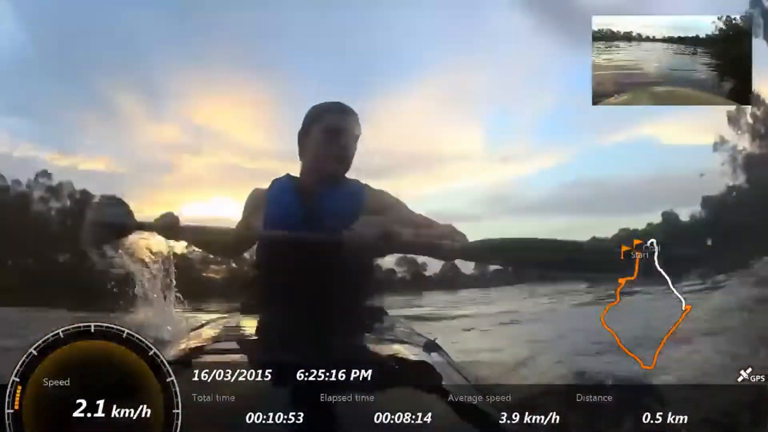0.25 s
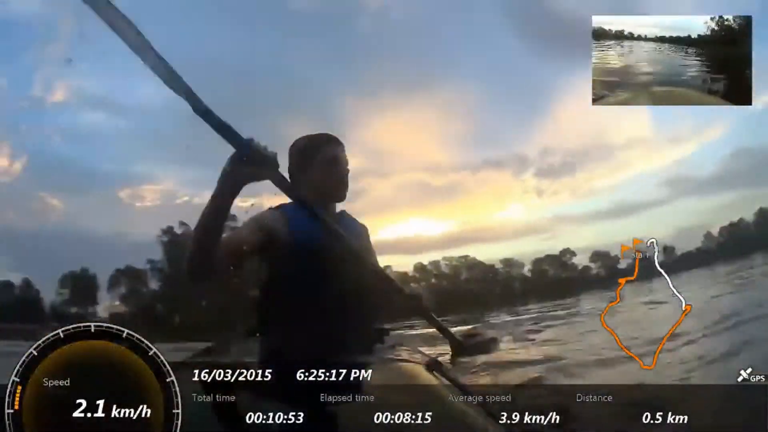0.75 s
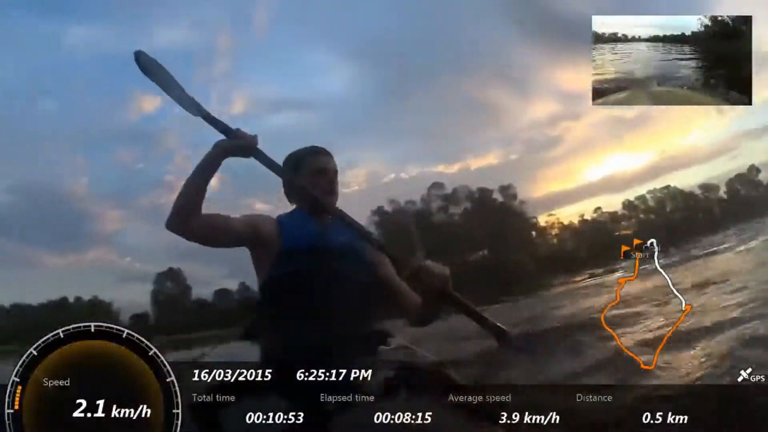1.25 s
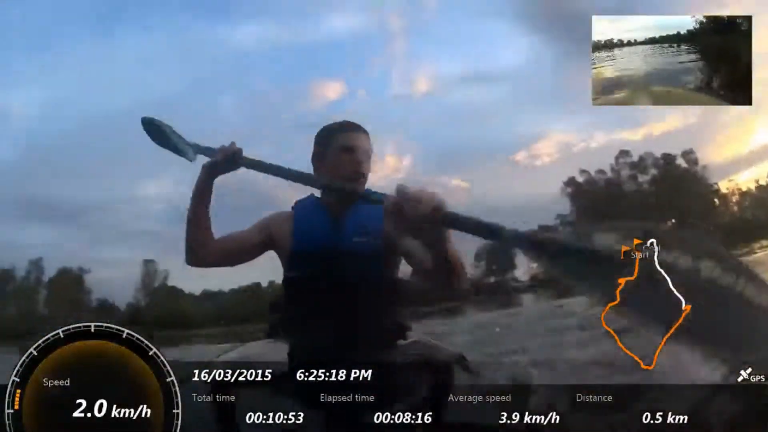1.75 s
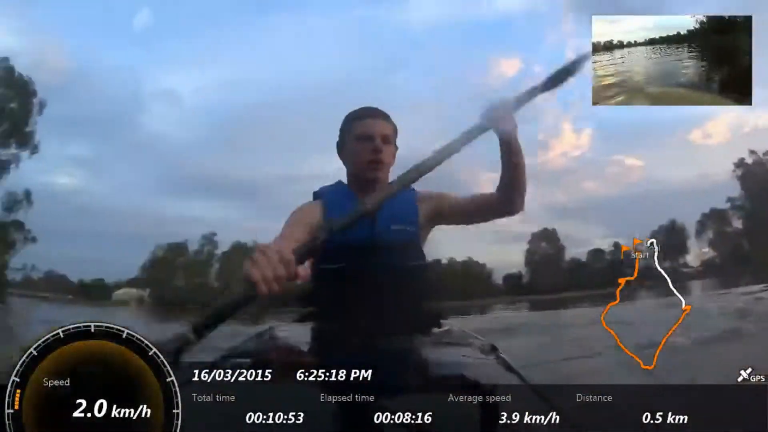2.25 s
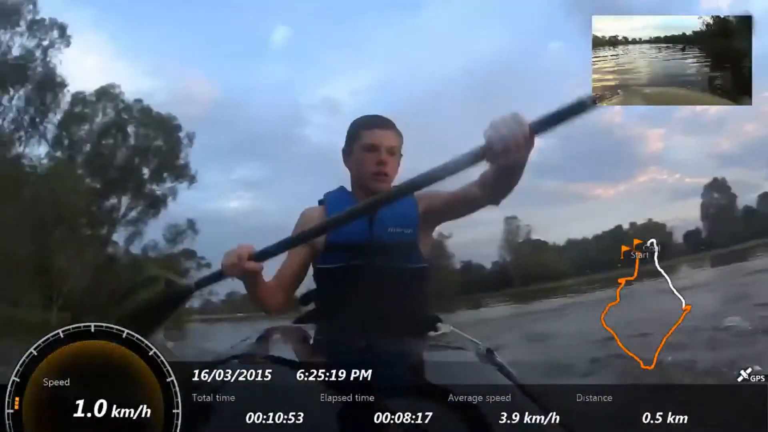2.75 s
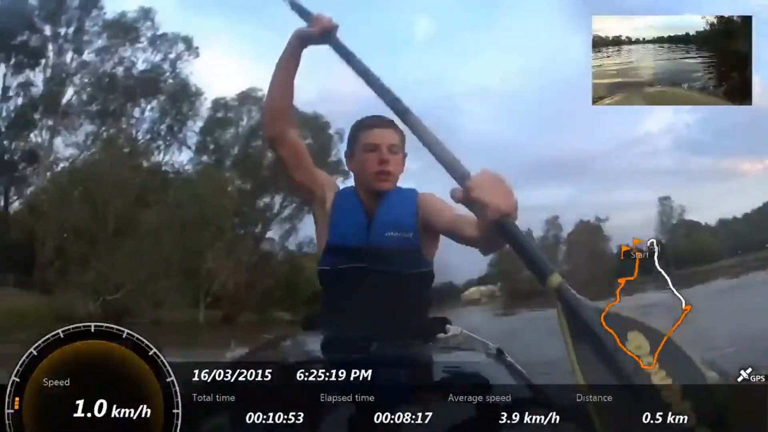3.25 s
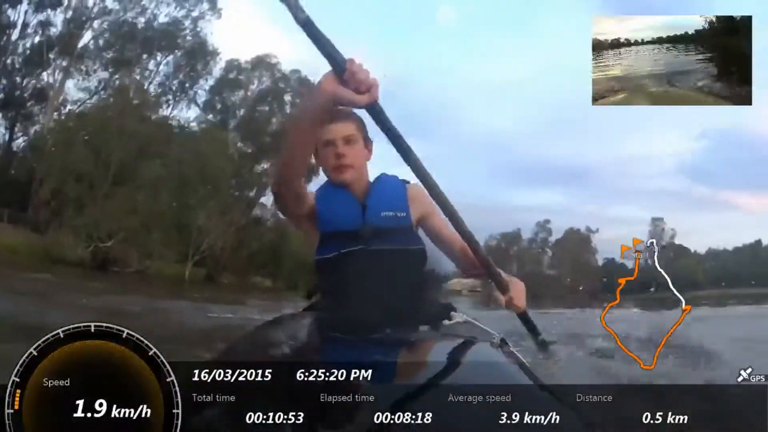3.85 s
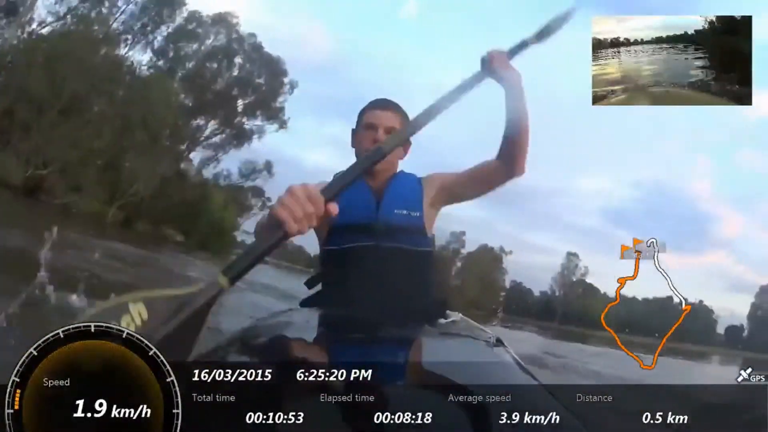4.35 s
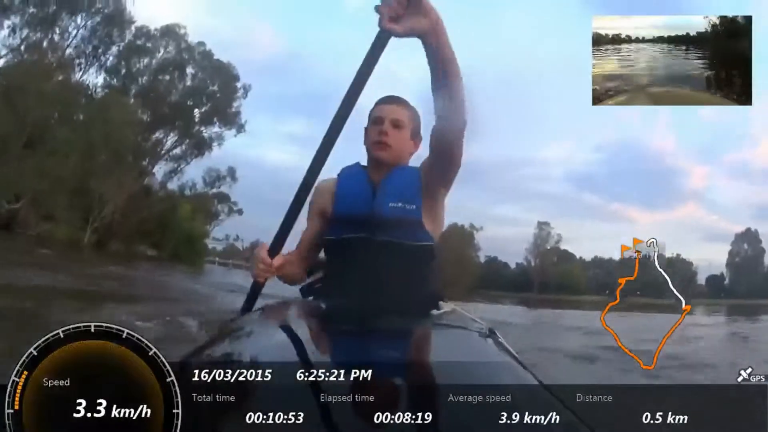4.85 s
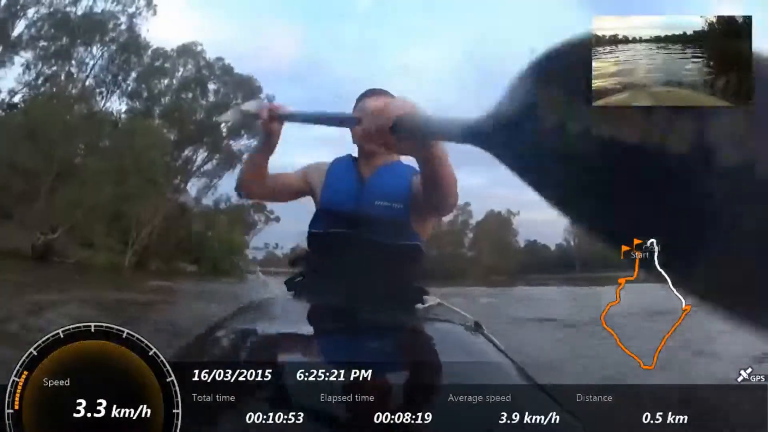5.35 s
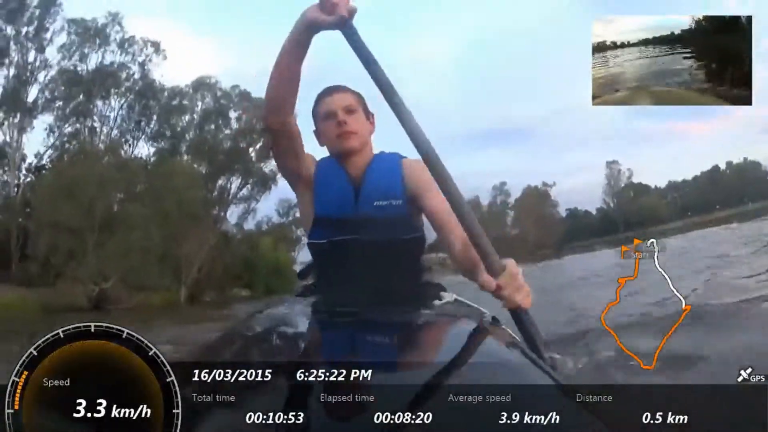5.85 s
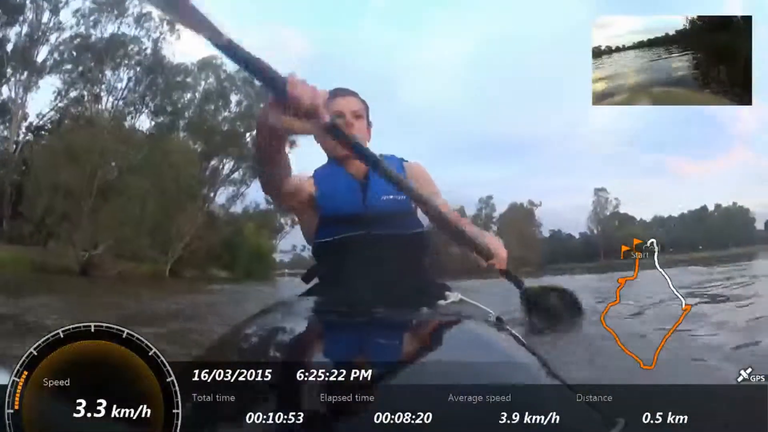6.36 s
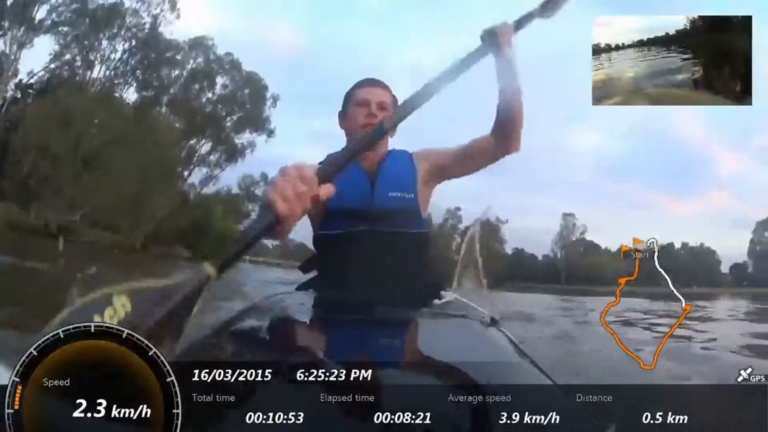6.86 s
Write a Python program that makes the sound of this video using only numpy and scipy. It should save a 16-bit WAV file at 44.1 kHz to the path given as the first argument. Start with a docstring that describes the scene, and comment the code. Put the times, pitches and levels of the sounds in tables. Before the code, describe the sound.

Close, boxy, muffled water from a sealed microphone on a kayak deck, slightly wide in stereo. From 0 s a dense bubbling wash runs along the hull over low hollow booms and faint fizzing spray. Rounded glugs pop through it, with a rough paddle gulp and flat smack near 0.5 s, another smack at 0.7 s, and a small spatter at 1.2 s. Slaps and gurgles crowd 1.3 to 2 s, with prominent glugs around 2 s and a sharp splash at 2.25 s. The wash swells from 2.4 to 2.9 s, with a strong gulp at 2.8 s, then falls away after 3 s. Quieter lapping continues with separate hollow slaps and ticking deck drips. Gulps and a dull thump come around 4.4 to 4.6 s, a cluster of slaps from 5 to 5.5 s, then small splashes near 6.1 and 6.6 s, trickling on softly to about 7 s.

```python
"""A kayak is paddled up a river, heard by two microphones in a waterproof housing on the deck.
From the start the bow wave washes along the hull as clouds of bubbles, over a low boom and fizzing spray.
Large bubbles glug as single notes, wavelets slap the hull with noise and a ringing air pocket, and
blades gulp as bursts of rough noise; later, drops tick on the deck as short clicks.
After three seconds the wash thins to single slaps. The housing's filter makes everything boxy and dull."""
import sys
import numpy as np
from scipy import signal
from scipy.fft import rfft, irfft
from scipy.io import wavfile
from scipy.ndimage import uniform_filter1d, minimum_filter1d

SR = 44100
rng = np.random.default_rng(int(sys.argv[2]) if len(sys.argv) > 2 else 0)


def dump(signal):
    """Clip the signal to [-1, 1] and save it as 16-bit WAV at the path in sys.argv[1]."""
    limited = np.clip(np.atleast_2d(signal).T, -1, 1)
    pcm = np.round(limited * 32767).astype(np.int16)
    wavfile.write(sys.argv[1], SR, pcm)


N = 313110
TIME = np.arange(N) / SR  # seconds

# Levels in the tables are relative: the mix, and for some layers a trim, come afterwards.
# water running along the hull: (t/s, wash of small bubbles level/dB, slosh of larger ones level/dB)
WATER_FLOW = [(0.0, -30, -32), (0.67, -31.5, -34), (0.78, -32.5, -35.5), (1.14, -34, -35.5),
              (1.25, -29.5, -31), (1.6, -34.5, -38.5), (1.85, -29.5, -32), (2.36, -27, -34),
              (2.52, -29.5, -39.5), (2.77, -27.5, -38), (2.98, -36.5, -40.5), (3.45, -40, -37),
              (3.9, -43, -52.5), (4.02, -39, -42.5), (4.7, -39, -44.5), (4.86, -41.5, -52),
              (5.05, -37, -40), (5.48, -36, -36), (6.0, -40, -43.5), (6.33, -37, -47), (6.51, -41.5, -55),
              (6.6, -39.5, -43), (6.8, -43, -49), (6.97, -37.5, -43), (7.1, -41, -51)]
# treble from fine spray: (t/s, level/dB)
SPRAY_LEVEL = [(0.0, -44), (0.3, -46.8), (0.65, -47.5), (0.78, -51), (1.12, -51), (1.26, -49),
               (1.53, -52.5), (2.58, -43), (3.1, -55), (3.3, -56), (4.22, -56.5), (4.6, -65), (4.95, -54),
               (5.8, -54.5), (6.55, -51.5), (7.1, -51.5)]
# the boat heaves and presses on the water:
# (middle t/s, half length t/s, churn of air pockets level/dB, boom of the hull level/dB)
BOAT_HEAVES = [(0.564, 0.065, -35, -64), (0.735, 0.085, -43, -59), (0.935, 0.052, -40, -56),
               (1.35, 0.04, -35, -59), (1.82, 0.13, -39, -63), (2.38, 0.039, -42, -58),
               (2.836, 0.058, -39.5, -57.5), (4.085, 0.21, -47, -74), (4.452, 0.04, -39, -70),
               (4.505, 0.043, -61, -48), (4.634, 0.04, -37.5, -60), (5.09, 0.088, -45.5, -66),
               (5.402, 0.35, -47, -78), (5.725, 0.11, -39, -55), (6.078, 0.069, -49, -72),
               (6.97, 0.027, -47, -72)]
# large single bubbles by the hull: (t/s, peak level/dB, f/Hz)
BUBBLE_GLUGS = [(.035, -27, 361), (.109, -25, 1410), (.362, -23.5, 421), (.81, -25, 610),
                (1.107, -26.5, 1545), (1.194, -19, 1267), (1.552, -24, 690), (1.624, -37, 156),
                (1.855, -24, 976), (1.945, -19.5, 1214), (2.002, -17, 620), (2.36, -27, 1560),
                (2.667, -21, 1305), (2.724, -23, 1145), (4.175, -32, 1576), (4.944, -31, 1556)]
# softer wavelets that swell and gurgle: (middle t/s, level/dB, f/Hz, half length t/s)
WAVELET_SURGES = [(0.208, -29, 1190, 0.035), (0.663, -27.5, 960, 0.061), (0.921, -26, 866, 0.021),
                  (0.982, -30, 1230, 0.022), (1.249, -30, 1120, .02), (1.393, -29.5, 1060, 0.014),
                  (1.71, -28, 910, 0.045), (3.228, -29, 1100, 0.035), (3.361, -29, 1180, 0.022),
                  (3.61, -33.5, 1020, 0.017), (4.201, -29, 880, 0.021), (5.453, -26, 854, 0.017),
                  (5.513, -27, 910, 0.028), (5.892, -30.5, 1070, 0.031), (6.155, -38, 1190, 0.022),
                  (6.605, -38, 766, 0.024), (6.933, -39.5, 586, 0.034)]
# wavelets slapping the hull: (t/s, level/dB, trapped air at first f/Hz, at last f/Hz, length t/s)
WAVELET_SLAPS = [ (0.335, -24, 1107, 990, 0.012), (0.874, -33, 1160, 1080, 0.017),
                 (1.457, -28, 713, 590, 0.014), (1.493, -26, 1433, 1044, 0.014),
                 (1.641, -29.5, 1430, 1254, 0.013), (2.219, -25, 585, 440, 0.036),
                 (2.747, -27, 1550, 1300, 0.01), (3.005, -29, 902, 590, 0.018),
                 (3.091, -24, 1490, 1013, 0.021), (3.246, -28, 1013, 606, 0.025),
                 (3.688, -33.5, 1384, 1252, 0.032), (3.739, -32, 558, 630, 0.031),
                 (3.979, -37, 930, 1100, 0.012), (4.158, -40, 1180, 1100, .008),
                 (4.369, -27.5, 1210, 950, 0.0074), (4.808, -38, 1520, 1460, 0.011),
                 (5.0, -29.5, 1010, 1170, 0.0051), (5.12, -25, 1070, 920, 0.014),
                 (5.247, -24.5, 950, 810, 0.015), (5.365, -27, 1070, 795, 0.0081),
                 (5.392, -28.5, 955, 1096, 0.011), (5.41, -29, 1150, 990, 0.014),
                 (5.925, -29, 1510, 1375, 0.012), (6.053, -38, 1197, 800, 0.033),
                 (6.243, -34.5, 1495, 1290, 0.0082), (6.559, -36.5, 1680, 1526, 0.029)]
# handfuls of spray thrown by a blade or a wavelet: (t/s, level/dB, length t/s, centre f/Hz)
SPRAY_SPATTERS = [(0.341, -57, 0.1, 8500), (1.236, -39.5, 0.035, 3220), (3.044, -63, 0.056, 11000),
                  (3.35, -43, .013, 3180), (4.186, -48.5, .017, 3200), (4.394, -40, 0.027, 2870),
                  (4.582, -50.5, 0.035, 3200)]
# gulps as a blade plunges in or the hull drops: (t/s, level/dB, centre f/Hz, length t/s)
WATER_GULPS = [(0.479, -31, 583, 0.056), (2.785, -27, 460, .045), (4.372, -30, 540, 0.068),
               (4.584, -34.5, 646, 0.036)]
# sheets of water landing flat beside the housing: (t/s, peak level/dB)
WATER_SMACKS = [(.486, -23.5), (0.68, -23.5), (1.304, -31), (1.494, -30.5), (1.909, -33), (2.251, -19.5),
                (6.074, -26), (6.561, -28)]
# drops landing on the deck: (t/s, peak level/dB, f/Hz)
DECK_DRIPS = [(1.218, -40.5, 3040), (1.744, -43, 3230), (2.089, -39.5, 4110), (2.711, -40, 2800),
              (2.924, -40.5, 3980), (3.272, -45, 2880), (3.314, -40, 3370), (3.592, -43, 3380),
              (3.734, -47.5, 4770), (4.437, -46, 2810), (4.917, -51, 4470), (4.941, -52, 4300),
              (5.509, -47.5, 2810), (5.561, -46, 2800), (5.697, -49, 2780), (6.156, -46, 2810),
              (6.244, -42, 3400), (6.56, -45, 2820), (6.934, -44, 2770)]
# drops striking the housing itself: (t/s, peak level/dB)
HOUSING_TICKS = [(1.311, -31), (1.463, -34), (1.745, -30), (2.926, -42), (4.997, -37), (5.12, -42),
                 (5.51, -40), (6.073, -35)]
# what the wall of the housing lets through: (f/Hz, level/dB)
WALL_LEVEL = [(30, -17.5), (140, -8), (450, -2.5), (720, -2), (840, -10), (1100, -1), (1400, -3.5),
              (1650, -11.5), (1800, -18), (2400, -25), (3800, -29.5), (5200, -24), (7000, -27),
              (11000, -31)]
# resonances of the housing: (f/Hz, width f/Hz, lift level/dB)
HOUSING_MODES = [(627, 290, 10), (976, 91, 9.5), (1255, 225, 6), (1592, 136, 11), (1976, 430, 5.5),
                 (2810, 540, 13.5), (3390, 530, 11), (4185, 380, 11.5), (4590, 180, 9.5), (5600, 300, 6.5)]
# how alike the two microphone ports hear the sound: (f/Hz, likeness from 0 to 1)
PORT_LIKENESS = [(200, .9), (420, .5), (520, .93), (1000, .92), (1350, .78), (1600, .95), (1850, .55),
                 (4700, .62), (7000, .25)]
# how far the left port leads the right: (f/Hz, phase/rad)
PORT_LEAD = [(100, 0), (430, -.25), (760, -1.35), (1100, .6), (1440, -.6), (1750, 1.6), (1980, .1),
             (2240, 2.8), (2760, .6), (3150, 2.6), (3450, 1.1), (3880, 2.4), (4300, .4)]
# how much louder the left port is than the right: (f/Hz, level/dB)
PORT_LEAN = [(80, -4), (150, -3), (700, -3), (980, -1), (1220, -3), (1600, 0), (9000, -0.5)]

CHURN_DB, BOOM_DB = -9, -34.5  # level relative to the slosh, away from the heaves
HULL_HZ = 76.6  # lowest mode of the hull
RISE_S = .0005  # time in which slaps and gulps set in
GLUG_CYCLES, GLUG_GLIDE = 4.44, 0.07  # cycles to the peak; share by which the pitch ends above its table value
HISS_DB, LIMIT_DB, EDGE_HZ = -69, -15.7, 11150  # microphone hiss, limiter threshold, top of the treble


def amp(db):
    """Turns decibels into a gain."""
    return 10 ** (np.asarray(db) / 20)


def read(points, hz):
    """Reads a curve joined by straight lines over log frequency."""
    f, value = np.transpose(points)
    return np.interp(np.log(hz + 1), np.log(f), value)


def level(table, axis):
    """Turns one dB column into a gain for every sample."""
    rows = np.array(table)
    return amp(np.interp(TIME, rows[:, 0], rows[:, axis]))


def evened(pair):
    """Scales a stereo pair so that the average of its two sides has rms 1."""
    return pair / np.sqrt(np.mean(pair.mean(0) ** 2) + 1e-20)


def peaked(pair, db):
    """Scales a stereo pair to a peak level in dB."""
    return amp(db) * pair / abs(pair).max()


def add(mix, s, sound):
    """Mixes a stereo sound in at s seconds."""
    part = mix[:, max(0, round(s * SR)):][:, :sound.shape[1]]
    part += sound[:, :part.shape[1]]


def band(x, low_hz, high_hz, order=2):
    """Keeps the frequencies between two edges (Butterworth band-pass)."""
    return signal.sosfilt(signal.butter(order, [low_hz, high_hz], "band", fs=SR, output="sos"), x)


def resonate(x, hz, width_hz):
    """Filters through a resonance of gain 1 that follows the curve hz."""
    turn = np.exp(2j * np.pi * np.cumsum(hz) / SR)
    r = np.exp(-np.pi * width_hz / SR)
    # shift the resonance to zero frequency, smooth there, and shift back
    return 2 * (turn * signal.lfilter([1 - r], [1, -r], x / turn)).real


def housing(size=2048):
    """The wall dulls and the box rings: responses from a shared and an unshared sound field to both ports."""
    hz = np.fft.rfftfreq(size, 1 / SR)
    db = read(WALL_LEVEL, hz)
    for f, width, lift in HOUSING_MODES:
        db = db + lift / (1 + (2 * (hz - f) / width) ** 2)
    log_gain = np.log(amp(np.r_[db, db[-2:0:-1]]))
    colour = np.exp(signal.hilbert(log_gain).conj())[:len(hz)]  # causal: the box rings after the blow
    likeness = np.clip(read(PORT_LIKENESS, hz), 0, 1)
    shared, apart = np.sqrt(1 + likeness), np.sqrt(1 - likeness)
    left = amp(read(PORT_LEAN, hz) / 2) * np.exp(.5j * read(PORT_LEAD, hz))
    paths = np.array([[left * shared, left * apart], [shared / left, -apart / left]])
    # a short delay leaves room for the port that leads
    return np.roll(irfft(colour * paths), size // 32, axis=-1)


def inside(fields, box):
    """Passes two sound fields through the housing to the ports, and takes its delay out again."""
    delay = box.shape[-1] // 32
    return signal.oaconvolve(fields[None], box, axes=2).sum(1)[:, delay:delay + fields.shape[1]]


def bubbles(low_hz, high_hz, cycles, spread_db, glide, count, size):
    """Two clouds of count bubbles: each rings for a few cycles as its pitch rises; a few are louder."""
    clouds, step = [], np.arange(size)
    for when, pitch, chance, bend in rng.random((2, 4, count, 1)):
        hz = low_hz * (high_hz / low_hz) ** pitch
        turns = (hz * step / SR).astype(np.float32)
        age = turns / np.float32(cycles)
        strength = amp(spread_db * np.minimum(-np.log(1 - chance), 4))
        climb = 1 + (glide * bend).astype(np.float32) * np.tanh(age)
        ring = np.exp(-age) * np.sin(2 * np.pi * turns * climb)
        faded = strength * ring * (1 - step / size)
        at = (when * N).astype(int) + step
        clouds.append(np.bincount(at.ravel(), faded.ravel(), N + size)[:N])
    return np.array(clouds)


def lumps(rate_hz, depth_db):
    """A gain that wanders at random, as water arrives in clumps."""
    hz = np.fft.rfftfreq(N, 1 / SR)
    wander = irfft(rfft(rng.standard_normal(N)) / (1 + (hz / rate_hz) ** 4), N)
    return amp(depth_db * wander / wander.std())


def heaving(rest_db, axis):
    """Gain of a low layer: it follows the slosh, and swells and sinks with each heave of the boat."""
    power = (amp(rest_db) * level(WATER_FLOW, axis=2)) ** 2
    for row in BOAT_HEAVES:
        swell = amp(row[axis]) * np.exp(-.5 * ((TIME - row[0]) / row[1]) ** 2)
        power = power + swell ** 2
    return np.sqrt(power)


def bow_wave(box):
    """Bubbles of three sizes break along the hull; the two smaller sizes come in shared clumps."""
    clumps = lumps(rate_hz=16, depth_db=.6)
    wash = bubbles(low_hz=760, high_hz=1680, cycles=6, spread_db=.4, glide=.12, count=3600, size=1024)
    slosh = bubbles(low_hz=272.7, high_hz=769, cycles=12, spread_db=0.4, glide=0.14, count=1500, size=2048)
    churn = bubbles(low_hz=138.1, high_hz=326, cycles=4.5, spread_db=.6, glide=0.12, count=1100, size=3072)
    wash = evened(inside(band(wash, 627, 2830) * clumps, box))
    slosh = evened(inside(band(slosh, 182, 900) * clumps, box))
    churn = evened(inside(band(churn, 129, 335, order=3), box))
    return (amp(-1.03) * level(WATER_FLOW, axis=1) * wash
            + amp(-2.5) * level(WATER_FLOW, axis=2) * slosh
            + amp(-1.0) * heaving(CHURN_DB, axis=2) * churn)


def plops(box):
    """Small bubbles chirp through the wash, rising in pitch as they surface."""
    chirps = bubbles(low_hz=480, high_hz=1500, cycles=9, spread_db=.6, glide=.22, count=260, size=2048)
    return amp(-10.5) * level(WATER_FLOW, axis=1) * evened(inside(chirps, box))


def hull(box):
    """The hollow hull booms at its lowest mode as water pushes on it, over a faint steady rumble."""
    push = rng.standard_normal((2, N))
    mode = np.eye(2, 1) * np.sin(2 * np.pi * HULL_HZ * TIME)  # one mode, shared by both ports
    boom = mode + amp(-7.5) * evened(band(push, 62, 124, order=3))
    rumble = evened(inside(band(push, 14, 80), box))
    return amp(1.5) * heaving(BOOM_DB, axis=3) * evened(inside(boom, box)) + amp(-71.5) * rumble


def spray(box):
    """Droplets plink over the fizz of bursting foam; the denser the spray, the more the fizz takes over."""
    plinks = bubbles(low_hz=2450, high_hz=5000, cycles=11, spread_db=3.3, glide=.1, count=460, size=512)
    fizz = bubbles(low_hz=1810, high_hz=11500, cycles=3.2, spread_db=1.25, glide=.05, count=13000, size=128)
    clusters = lumps(rate_hz=17, depth_db=2.5)
    plinks = evened(inside(band(plinks, 1400, 8000) * clusters, box))
    fizz = evened(inside(band(fizz, 1733, 10000, order=3) * clusters, box))
    gain = level(SPRAY_LEVEL, axis=1)
    return amp(-4) * np.sqrt(gain * gain.mean()) * plinks + amp(0.3) * gain * fizz


def glug(db, hz, box, size=8192):
    """One large bubble swells into a nearly pure note, climbs a little and dies."""
    age = np.arange(size) / SR * hz / GLUG_CYCLES
    turns = np.cumsum(hz * (1 + GLUG_GLIDE * np.tanh(age - 1))) / SR
    note = age * np.exp(-age) * np.sin(2 * np.pi * turns)
    return peaked(inside(np.eye(2, 1) * note, box), db)


def surge(middle, db, hz, half, box):
    """A wavelet rolls up the hull: a gurgle that swells and fades while its pitch sinks."""
    t = np.arange(-.1, .1, 1 / SR)
    pitch = hz * (1 - 0.21 * np.tanh(t / half))
    noise = rng.standard_normal((2, len(t)))
    gurgle = resonate(resonate(noise, pitch, hz * 1.13), pitch, hz * 0.85)
    sound = inside(gurgle * np.exp(-(t / half) ** 2), box)
    return middle + t[0], amp(db) * evened(sound) * np.sqrt(half / np.ptp(t))


def slap(db, first_hz, last_hz, length, box):
    """A wavelet traps air against the hull: a splat, and a pocket that rings as it changes size."""
    t = np.arange(int((3 * length + .04) * SR)) / SR
    hz = last_hz + (first_hz - last_hz) * np.exp(-(t / length / 0.593) ** 2)
    impact = 1 + .8 * np.exp(-t / .004)
    burst = impact * (1 - np.exp(-t / RISE_S)) * np.exp(-(t / length) ** 2)
    splat = rng.standard_normal((2, len(t)))
    gurgle = evened(resonate(resonate(splat, hz, first_hz * 0.74), hz, first_hz * 0.47))
    # the ringing pocket is a single point source, so both ports share it
    pocket = np.sin(2 * np.pi * (np.cumsum(hz) / SR + rng.random())) * np.eye(2, 1)
    splash = evened(band(splat, 150, 1700, order=4))
    sound = inside((gurgle + amp(7) * pocket + amp(-5) * splash) * burst, box)
    return amp(db) * evened(sound) * np.sqrt(length / t[-1])


def spatter(db, length, hz, box, size=8192):
    """A crowd of tiny drops lands together as random clicks that fade away."""
    t = np.arange(size) / SR
    landed = rng.random(size) < 2000 / SR  # about 2000 drops a second
    drops = rng.standard_normal((2, size)) * landed * np.exp(-(t / length) ** 2)
    sound = inside(band(drops, hz * 0.56, hz * 1.47), box)
    return amp(db) * evened(sound) * np.sqrt(length / t[-1])


def gulp(db, hz, length, box, size=8192):
    """Water closes over a pocket of air, which tears up: a broad, rough burst of noise."""
    t = np.arange(size) / SR
    turbulence = band(rng.standard_normal((2, size)), hz * 0.48, hz * 1.29, order=3)
    sound = inside(turbulence * (1 - np.exp(-t / RISE_S)) * np.exp(-(t / length) ** 2), box)
    return amp(db) * evened(sound) * np.sqrt(length / t[-1])


def smack(db, box, size=1024):
    """A sheet of water lands flat: a sharp crack that rings the upper resonances of the housing."""
    t = np.arange(size) / SR
    crack = rng.standard_normal((2, size)) * np.exp(-(t / 0.0061) ** 2)
    return peaked(inside(band(crack, 1730, 2900, order=3), box), db)


def drip(db, hz, box, size=1500):
    """A drop hits the deck with a click and short spatter; its tiny bubble rings briefly, rising in pitch."""
    t = np.arange(size) / SR
    point = np.eye(2, 1)  # a point source, shared by both ports
    click = 6 * point * (t == 0)
    spray_noise = rng.standard_normal((2, size)) * np.exp(-t / 0.0029)
    ring = amp(6) * point * np.sin(2 * np.pi * hz * t * (1 + 6 * t)) * np.exp(-t / .0028)
    return peaked(inside(band(click + spray_noise + ring, 1700, 6800), box), db)


def tick(db, box, size=1024):
    """A drop strikes the housing: a dry, bright click with no bubble."""
    click = rng.standard_normal((2, size)) * np.exp(-np.arange(size) / SR / 0.00077)
    return peaked(inside(band(click, 4000, 8000), box), db)


def scene():
    """All the water, heard through the housing."""
    box = housing()
    steady = bow_wave(box) + plops(box) + hull(box) + spray(box)
    glugs, waves, splashes, drips = np.zeros((4, 2, N))
    for s, *row in BUBBLE_GLUGS:
        add(glugs, s, glug(*row, box))
    for row in WAVELET_SURGES:
        add(waves, *surge(*row, box))
    for s, *row in WAVELET_SLAPS:
        add(waves, s, slap(*row, box))
    for s, *row in SPRAY_SPATTERS:
        add(splashes, s, spatter(*row, box))
    for s, *row in WATER_GULPS:
        add(waves, s, gulp(*row, box))
    for s, db in WATER_SMACKS:
        add(splashes, s, smack(db, box))
    for s, *row in DECK_DRIPS:
        add(drips, s, drip(*row, box))
    for s, db in HOUSING_TICKS:
        add(splashes, s, tick(db, box))
    return steady + glugs + amp(-0.5) * waves + splashes + amp(17.0) * drips


def record(dry):
    """A fast limiter holds down the loudest peaks; then come faint microphone hiss and the treble limit."""
    peak_db = 20 * np.log10(abs(dry).max(0) + 1e-9)
    over_db = np.maximum(peak_db - LIMIT_DB, 0)
    fall = TIME * 350  # the limiter lets go at 350 dB a second
    held_db = np.maximum.accumulate(over_db + fall) - fall
    # widen each cut to both sides, then smooth its edges
    cut_db = uniform_filter1d(-minimum_filter1d(-held_db, size=65), size=65)
    hiss = amp(HISS_DB) * evened(band(rng.standard_normal((2, N)), 2000, 7300, order=1))
    heard = dry * amp(-cut_db) + hiss
    low_pass = signal.firwin(511, EDGE_HZ, window=("kaiser", 9), fs=SR)
    return signal.oaconvolve(heard, low_pass[None], "same")


dry = scene()
out = record(dry)
dump(out)
```